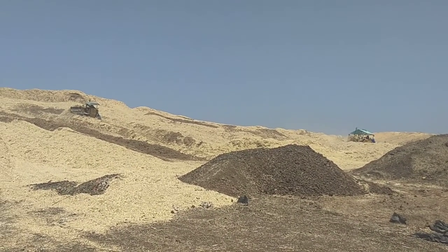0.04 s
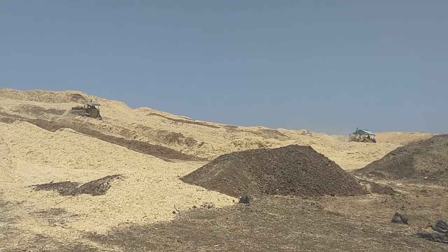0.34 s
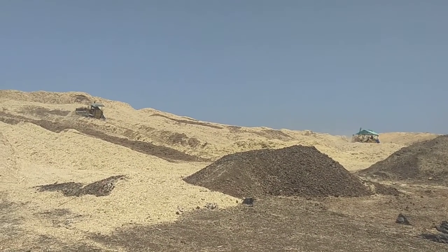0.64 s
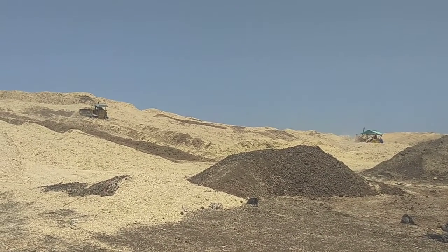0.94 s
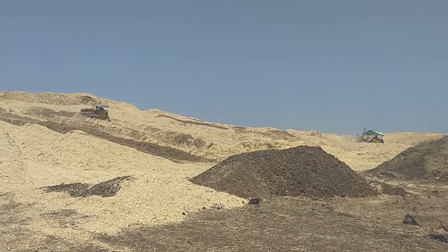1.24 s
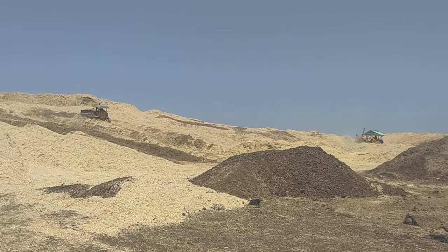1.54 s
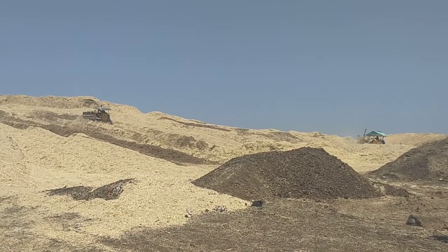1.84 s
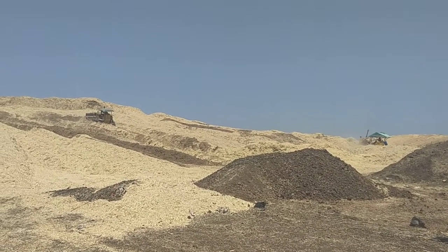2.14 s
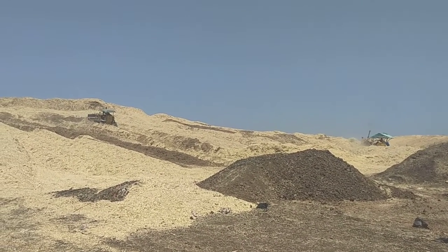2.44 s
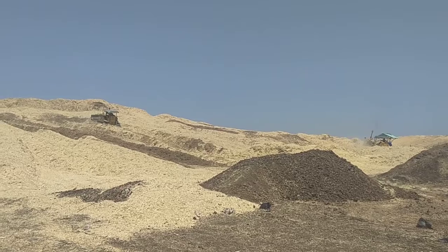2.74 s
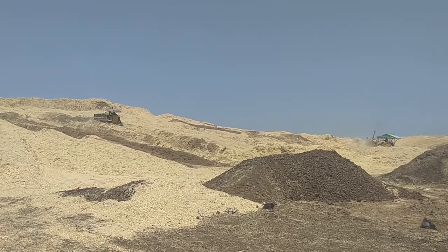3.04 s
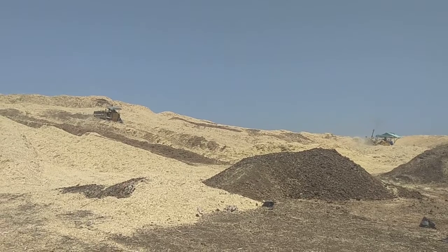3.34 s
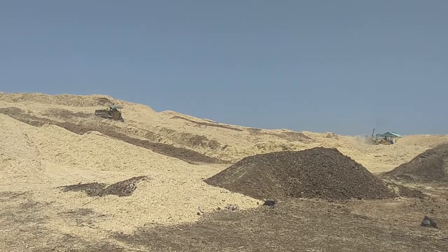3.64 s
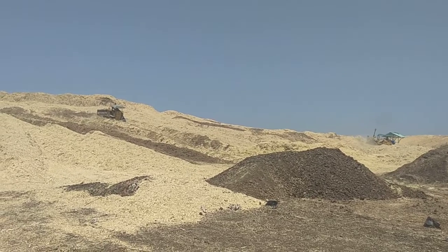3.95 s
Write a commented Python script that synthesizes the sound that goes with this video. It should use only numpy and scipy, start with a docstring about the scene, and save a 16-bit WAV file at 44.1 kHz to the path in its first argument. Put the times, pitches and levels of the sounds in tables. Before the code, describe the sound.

Distant bulldozers work outdoors with a low diesel drone and a slight gear whine. Gusts buffet the microphone throughout as the engines gradually swell, their steel tracks clinking faintly and more often toward the end.

```python
"""Bulldozers on a distant spoil heap, heard in the wind through a hand-held camera's two microphone ports.
At first the diesel drone, roar and gear whine sink back while eddies buffet the left port, which faces
the heap. From about 1.5 s the wind carries the machines over louder and the steel tracks clink more often.
After 3 s the injector clatter is at its sharpest and the buffets move to the right port. Throughout,
the camera's stereo widener feeds each port, delayed and inverted, into the other channel."""
import sys
import numpy as np
from scipy import signal
from scipy.fft import rfft, irfft, next_fast_len
from scipy.io import wavfile
from scipy.ndimage import uniform_filter1d, map_coordinates

SR = 44100
rng = np.random.default_rng(int(sys.argv[2]) if len(sys.argv) > 2 else 0)


def inscribe(sig):
    """Save sig as 16-bit PCM at rate SR to the path in sys.argv[1].

    A 1-D sig is mono; a 2-D sig holds one channel per row.
    Samples are clipped to [-1, 1] before scaling.
    """
    pcm = np.round(np.clip(np.atleast_2d(sig).T, -1, 1) * 32767)
    wavfile.write(sys.argv[1], SR, pcm.astype(np.int16))


N = 176400


# how strongly the wind carries the machines from the heap to the microphone: time_s, level_db
CARRY = [(0, -36.5), (.12, -45), (.3, -47), (.55, -45.5), (.85, -48), (1.25, -45.5), (1.45, -44.5),
         (1.62, -41), (1.9, -41.5), (2.25, -41), (2.38, -41), (2.48, -45), (2.75, -43), (2.95, -41),
         (3.07, -39.5), (3.2, -38.5), (3.45, -37.5), (3.72, -39.5), (3.9, -35.5), (4, -37.5)]
# the diesel's knocks, at half the firing rate: time_s, rate_hz
KNOCK_RATE = [(0, 43.37), (1.6, 42.58), (1.85, 44.84), (2.8, 45.27), (4, 45.05)]

def bulldozers():
    """Far off, roar, drone and whine swell together under the clatter; the right port gets diffuse roar."""
    carry = amp(curves(CARRY)[0])
    knock_hz, = curves(KNOCK_RATE)
    direct, diffuse = engine_roar(knock_hz)
    facing = carry * (direct + exhaust_drone(knock_hz) + gear_whine()) + injector_clatter(knock_hz)
    return np.array([facing, carry * diffuse])


# spectrum of engines, fans and tracks at a distance: frequency_hz, level_db
ROAR_SPECTRUM = [(40, -3), (200, -3), (600, -3), (730, 3), (860, -5), (1170, 1.5), (1450, -1), (1650, -2),
                 (1850, -2), (2300, -5.5), (2750, -13), (3100, -14), (4300, -20), (5500, -23.5),
                 (6500, -29), (7600, -31), (9000, -40), (15000, -43)]

def engine_roar(knock_hz, gain_db=3.5, far_port_db=-7):
    """Direct roar that throbs with the knocks and flutters, and an even, diffuse roar for the far port."""
    throb_db = 0.97 * np.sin(2 * np.pi * np.cumsum(knock_hz) / SR)
    roar = coloured(patchy_noise(depth_db=1.35), ROAR_SPECTRUM)
    flutter_db = 1.4 * wobble(rate_hz=30.01)
    diffuse = amp(far_port_db) * coloured(rng.standard_normal(N), ROAR_SPECTRUM)
    return amp(gain_db) * np.array([roar * amp(throb_db + flutter_db), diffuse])


# strength of successive strokes, repeating in threes: level_db
CYLINDERS = [2, 1, -0.5]

def strokes(rate_hz, scatter_db):
    """Impulses at a changing rate; the cylinders differ in strength."""
    at = np.flatnonzero(np.diff(np.floor(np.cumsum(rate_hz) / SR)))
    train = np.zeros(N)
    train[at] = amp(np.resize(CYLINDERS, len(at)) + scatter_db * rng.standard_normal(1024)[:len(at)])
    return train


# spectrum of the exhaust pulses: frequency_hz, level_db
EXHAUST_SPECTRUM = [(30, -31), (80, 9), (140, 1.5), (300, 5), (700, 14), (1500, -36.5)]

def exhaust_drone(knock_hz):
    """Uneven exhaust pulses, two to a knock, run together into a drone."""
    return amp(-7) * coloured(strokes(2 * knock_hz, scatter_db=9), EXHAUST_SPECTRUM)


# engine covers that ring with the clatter: pitch_hz, width_hz, gain_db
COVER_MODES = [(2500, 46, -2), (3110, 40, 5), (3130, 60, 0), (3400, 30, -17), (3540, 27, 2),
               (3660, 22, -17), (3910, 49, 11), (5530, 99, -26.5)]
# spectrum of the injectors: frequency_hz, level_db
CLATTER_SPECTRUM = [(1000, 7), (2000, 9), (2780, 5.5), (3200, 2), (4500, -2.5), (5600, 4), (6600, -8),
                    (7400, 0.5), (9000, -57), (15000, -37)]
# the clatter at the microphone, fading in and out more than the roar: time_s, level_db
CLATTER_LEVEL = [(0, -50), (.2, -51.5), (.5, -58.5), (1.25, -59.5), (1.65, -51), (1.85, -59), (2.2, -73),
                 (2.55, -60), (2.95, -54), (3.3, -45.5), (3.65, -49.5), (3.85, -47), (4, -45.5)]

def injector_clatter(knock_hz, decay_s=0.0046, gain_db=1):
    """Each knock is a short burst of noise that rings the engine covers."""
    def covers(f):
        return 1 + sum(amp(db) * 1j * f * width / (hz * hz - f * f + 1j * f * width)
                       for hz, width, db in COVER_MODES)

    age = np.arange(SR // 20) / SR / decay_s
    knocks = signal.fftconvolve(strokes(knock_hz, scatter_db=3.5), np.sqrt(age) * np.exp(-age))[:N]
    ringing = filtered(knocks * rng.standard_normal(N), covers)
    return coloured(ringing, CLATTER_SPECTRUM) * amp(gain_db + curves(CLATTER_LEVEL)[0])


# tones of the gears: pitch_hz, level_db, width_hz
GEAR_TONES = [(740, -22.5, 12), (1162, -13.5, 8), (1108, -20, 12), (1286, -18, 19), (1500, -20, 25)]

def gear_whine():
    """The gears sing in narrow bands, each wavering in strength and phase."""
    whine = np.zeros(N)
    for hz, db, width_hz in GEAR_TONES:
        phase = 2 * np.pi * hz * np.arange(N) / SR
        whine += amp(db) * unit(wobble(width_hz) * np.sin(phase) + wobble(width_hz) * np.cos(phase))
    return whine


# track shoes slapping down, faint at this distance: start_s, level_db
SHOE_SLAPS = [(.304, -52), (.78, -50), (.98, -52), (1.561, -43.5), (1.68, -63), (1.706, -48),
              (1.904, -50.5), (1.993, -54), (2.037, -51), (2.106, -43.5), (2.262, -46.5), (2.375, -48),
              (2.395, -40), (2.772, -50), (2.816, -46), (2.838, -46), (3.037, -44), (3.169, -39.5),
              (3.191, -45.5), (3.236, -53), (3.524, -41.5), (3.571, -38), (3.59, -47.5), (3.702, -40),
              (3.725, -42), (3.836, -51), (3.966, -41)]
# ringing of one shoe: pitch_hz, level_db, t60_s
SHOE_MODES = [(3460, -10, 0.018), (4700, 4, 0.022), (5430, 9.5, 0.025), (5660, 0.5, .025), (5900, 1, 0.022),
              (7300, -14, .02)]

def track_clinks(rattles_per_s=24, gain_db=-4.5, attack_s=0.0007):
    """Steel shoes slap down and ring briefly, with a light random rattle between; at the left port."""
    left, t = np.zeros(N + SR), np.arange(SR // 10) / SR
    at = rng.integers(N, size=round(rattles_per_s * N / SR))
    rattle_db = curves(CARRY)[0][at] + rng.normal(-13, 4, len(at))
    for start_s, level_db in SHOE_SLAPS + list(zip(at / SR, rattle_db)):
        ring = np.zeros(len(t))
        for hz, db, t60_s in SHOE_MODES:
            decay = amp(db + rng.normal(0, 1.3) - 60 * t / t60_s)
            phase = 2 * np.pi * hz * rng.normal(1, 0.024) * t
            drift = np.cumsum(rng.normal(0, 0.12, len(t)))  # roughens the tone
            ring += decay * np.sin(phase + drift)
        left[round(start_s * SR):][:len(t)] += amp(level_db + gain_db) * ring * (1 - np.exp(-t / attack_s))
    return np.array([left[:N], np.zeros(N)])


# eddies right on the microphone: time_s, size_s, level_db, pitch_hz, port (0 left, 1 right)
EDDIES = [(0.015, 0.0046, -9, 278, 0), (.044, 0.023, -16.5, 178, 0), (0.065, 0.004, -8, 247, 0),
          (0.068, 0.017, -5.5, 140, 0), (.117, 0.004, -11, 156, 0), (.158, 0.014, -9.5, 155, 0),
          (0.176, 0.015, -6.3, 200, 0), (.202, .009, -8.5, 108, 0), (.22, 0.0045, -6.5, 236, 0),
          (.228, 0.0023, -8, 288, 0), (0.258, 0.0036, -17, 199, 0), (0.361, 0.014, -20, 152, 0),
          (.379, 0.0075, -11, 250, 0), (0.394, 0.014, -15, 173, 0), (0.42, 0.0036, -10, 161, 0),
          (0.504, 0.0052, -13, 216, 0), (0.531, 0.03, -14, 208, 0), (.564, 0.014, -12.5, 194, 0),
          (0.622, 0.011, -6, 122, 0), (0.75, 0.017, -15, 228, 0), (0.778, 0.0098, -12.5, 236, 0),
          (.79, 0.013, -5, 116, 0), (.856, 0.026, -15.5, 151, 0), (0.937, 0.0082, -9.5, 297, 0),
          (.97, .01, -8.5, 127, 0), (1.002, 0.017, -8.5, 157, 0), (1.099, 0.0032, -12, 235, 0),
          (1.14, 0.007, -6, 138, 0), (1.154, 0.021, -11, 132, 0), (1.179, 0.0085, -7, 174, 0),
          (1.225, 0.022, -17, 147, 0), (1.293, 0.0062, -9.5, 178, 0), (1.348, 0.0041, -18, 170, 0),
          (1.625, 0.02, -17.5, 155, 1), (1.656, .014, -24, 150, 1), (1.728, 0.0076, -15.5, 182, 0),
          (1.753, 0.026, -10.5, 126, 0), (1.949, 0.018, -7.5, 149, 0), (2.063, 0.011, -10.5, 124, 0),
          (2.224, .024, -14.5, 131, 0), (2.234, 0.0044, -8, 216, 1), (2.266, 0.014, -17.5, 117, 1),
          (2.299, 0.0029, -7, 144, 0), (2.419, 0.0076, -5, 190, 0), (2.455, 0.0055, -16.5, 204, 0),
          (2.595, 0.016, -10.5, 99, 0), (2.656, 0.0049, -14, 118, 0), (2.682, 0.005, -10, 149, 0),
          (2.734, 0.0061, -4.5, 141, 0), (2.755, 0.0074, -11.5, 178, 0), (2.764, .007, -9, 324, 0),
          (2.868, 0.0056, -17.5, 220, 0), (2.909, 0.034, -11, 111, 0), (3.112, 0.0073, -15.5, 172, 1),
          (3.26, 0.019, -15.5, 165, 1), (3.591, 0.018, -9, 118, 1), (3.709, 0.011, -15, 184, 1),
          (3.835, 0.018, -8.5, 101.3, 1)]

def wind_buffets(kick_hz=229.7, scatter_db=3, lead_s=0.00296, gain_db=-2.92):
    """Each eddy is a short swell of uneven pressure kicks, heard as a low puff around its pitch."""
    size, count = 8192, 17  # samples and kicks per eddy
    out = np.zeros((2, N + 2 * size))
    order = np.arange(count) - count // 2
    for time_s, size_s, db, pitch_hz, port in EDDIES:
        jitter, strength, sign = rng.standard_normal((3, count))
        kick_s = (order + 0.312 * jitter * (order != 0)) / kick_hz
        half_length_s = 1.22 * size_s
        swell = np.cos(np.pi / 2 * np.clip(kick_s / half_length_s, -1, 1)) ** 2
        at = np.clip(np.round((kick_s - lead_s) * SR).astype(int) + size // 2, 0, size - 1)
        kicks = np.bincount(at, swell * np.sign(sign) * amp(scatter_db * strength), size)
        lowpass = signal.butter(4, 1.43 * pitch_hz, fs=SR, output="sos")
        highpass = signal.butter(3, 0.42 * pitch_hz, "high", fs=SR, output="sos")
        puff = signal.sosfilt(np.vstack([lowpass, highpass]), kicks)
        puff *= np.sqrt(half_length_s * SR) / np.linalg.norm(puff)  # energy grows with length
        out[int(port), round(time_s * SR) + size // 2:][:size] += amp(db + gain_db) * puff
    return out[:, size:size + N]


# steady wind across the ports: time_s, left_db, right_db
BREEZE_LEVEL = [(0, -38, -19), (.2, -24, -49), (.32, -39.5, -39.5), (.52, -25.5, -30.5), (.69, -37, -36.5),
                (.85, -26.5, -26.5), (1.15, -25.5, -32), (1.45, -33.5, -41), (1.66, -27, -22),
                (1.85, -30.5, -35.5), (2.2, -20.5, -25.5), (2.35, -35, -28.5), (2.5, -35, -26.5),
                (2.72, -33.5, -26.5), (3.0, -31.5, -28), (3.3, -28, -22), (3.7, -27.5, -27.5),
                (3.88, -41, -22.5), (4, -29, -22.5)]
# spectrum of its rumble: frequency_hz, level_db
RUMBLE_SPECTRUM = [(20, -27), (33, -18), (52, -0.5), (90, 2), (150, -1), (250, -11), (400, -20), (700, -37),
                   (1500, -48.5), (4000, -100)]

def breeze(lump_hz=23.54, flutter_hz=150.9, gain_db=5.5):
    """Wind on the microphone makes a lumpy, fluttering rumble, unrelated from port to port."""
    ports = []
    for level_db in curves(BREEZE_LEVEL):
        air = rng.standard_normal(N) * amp(2 * wobble(lump_hz) + 1.5 * wobble(flutter_hz))
        ports.append(amp(level_db + gain_db) * coloured(air, RUMBLE_SPECTRUM))
    return np.array(ports)


# noise floor of the microphone: frequency_hz, level_db
HISS_SPECTRUM = [(500, 22), (4000, 4), (9000, 2.5), (15500, 4)]

def microphone_hiss():
    """Faint, steady hiss, separate at each port."""
    return amp(-63.5) * coloured(rng.standard_normal((2, N)), HISS_SPECTRUM)


# how much of each port the camera feeds across: frequency_hz, share
CROSSFEED = [(40, 0.85), (1000, 0.77), (5000, 0.8)]

def stereo_widener(ports, delay_s=0.000425):
    """Each port goes, delayed and inverted, into the other channel."""
    f, share = np.transpose(CROSSFEED)
    cross = lambda hz: np.interp(np.log(hz + 1), np.log(f), share) * np.exp(-2j * np.pi * hz * delay_s)
    return ports - filtered(ports[::-1], cross)


def amp(db):
    """Decibels to gain."""
    return 10 ** (np.asarray(db) / 20)


def unit(x):
    """Scale to rms 1."""
    return x / np.sqrt(np.mean(x ** 2) + 1e-20)


def curves(rows):
    """One value per sample for each column after the time."""
    time_s, *columns = np.transpose(rows)
    return [np.interp(np.arange(N) / SR, time_s, column) for column in columns]


def wobble(rate_hz):
    """A smooth random curve with rate_hz knots a second."""
    return map_coordinates(rng.standard_normal(2048), [np.arange(N) * rate_hz / SR], mode="wrap")


def filtered(x, response):
    """x through a filter given as a function of frequency."""
    size = next_fast_len(N + SR // 2)
    return irfft(rfft(x, size) * response(np.fft.rfftfreq(size, 1 / SR)), size)[..., :N]


def coloured(x, spectrum):
    """x shaped by (frequency_hz, level_db) points, at rms 1."""
    f, db = np.transpose(spectrum)
    return unit(filtered(x, lambda hz: amp(np.interp(np.log(hz + 1), np.log(f), db))))


def patchy_noise(depth_db):
    """White noise with patches of random gain across frequency and time."""
    bins = signal.stft(rng.standard_normal(N), nperseg=1024)[2]
    patches = uniform_filter1d(rng.standard_normal(bins.shape), size=5, axis=0)
    patches = uniform_filter1d(patches, size=9, axis=1)
    return signal.istft(bins * amp(depth_db * unit(patches)), nperseg=1024)[1][:N]


def scene(leak_share=0.079, port_lag_s=0.00008):
    """Pressure at the two ports; a little direct sound reaches the one facing away, slightly late."""
    left, right = bulldozers() + track_clinks()
    right += leak_share * filtered(left, lambda hz: np.exp(-2j * np.pi * hz * port_lag_s))
    wind = (breeze() + wind_buffets()) * signal.windows.tukey(N, 0.003)
    overload = amp(-3)  # the strongest eddies round off at the diaphragm
    return np.array([left, right]) + overload * np.tanh(wind / overload)


def record(dry, top_hz=15500):
    """The camera adds microphone hiss, widens the stereo and cuts the highest treble."""
    wide = stereo_widener(dry + microphone_hiss())
    return filtered(wide, lambda hz: hz < top_hz)


dry = scene()
out = record(dry)
inscribe(out)
```